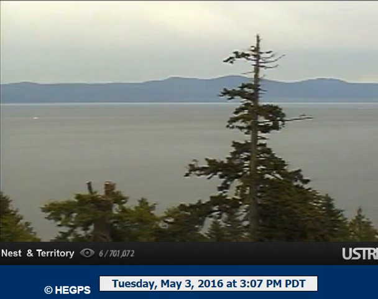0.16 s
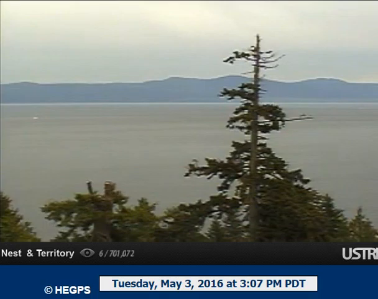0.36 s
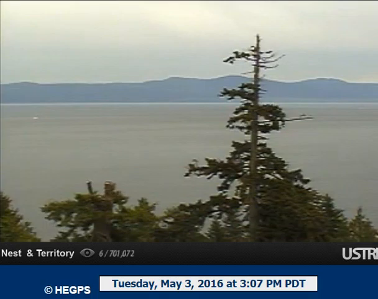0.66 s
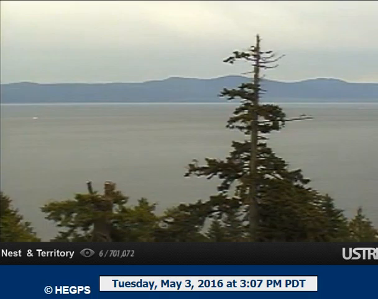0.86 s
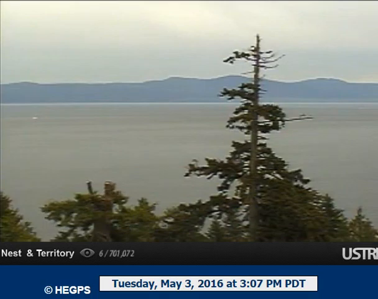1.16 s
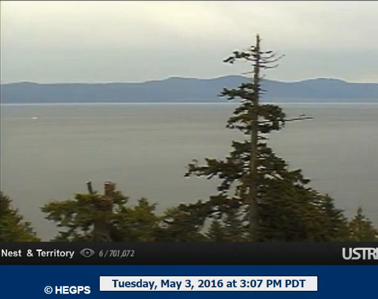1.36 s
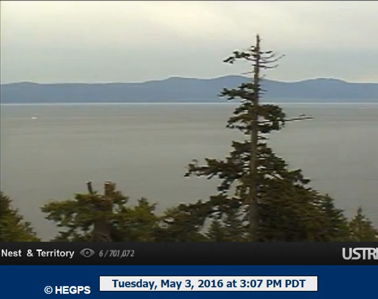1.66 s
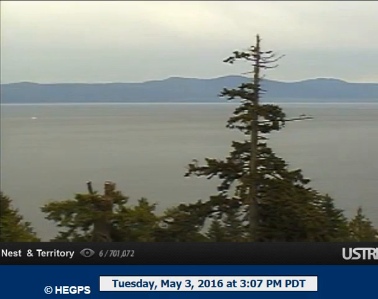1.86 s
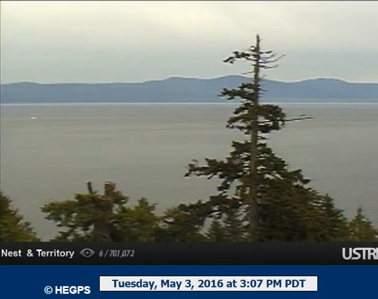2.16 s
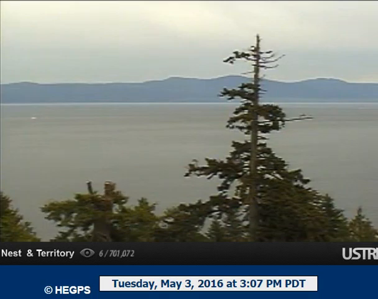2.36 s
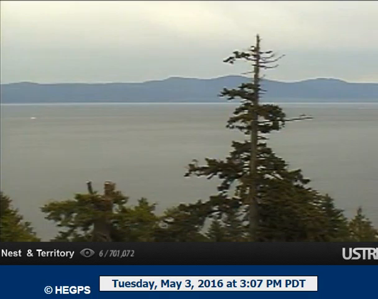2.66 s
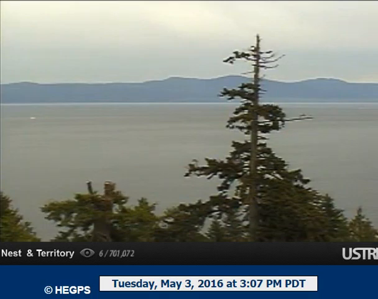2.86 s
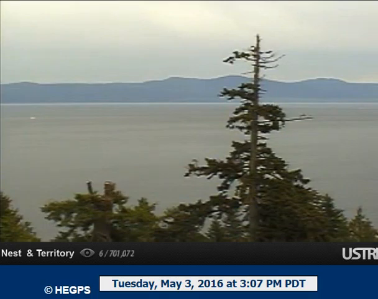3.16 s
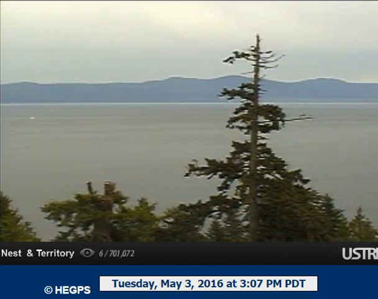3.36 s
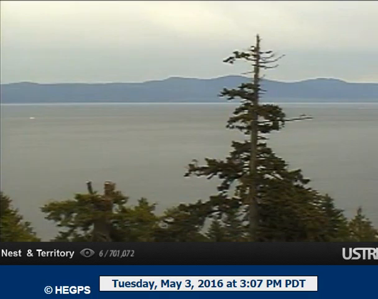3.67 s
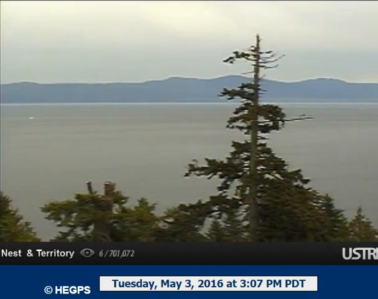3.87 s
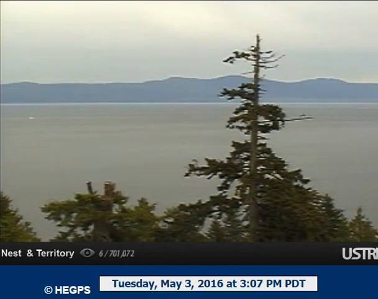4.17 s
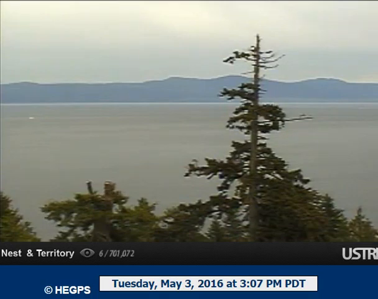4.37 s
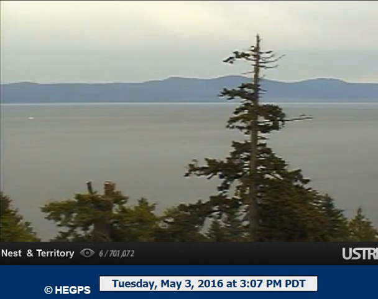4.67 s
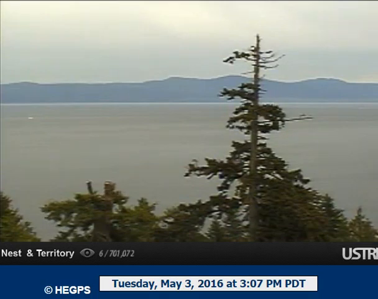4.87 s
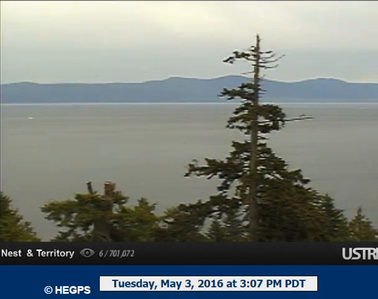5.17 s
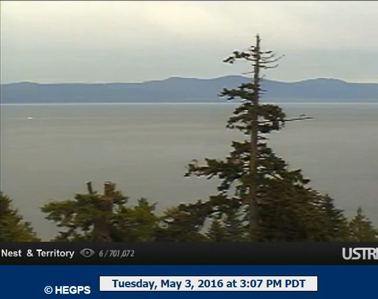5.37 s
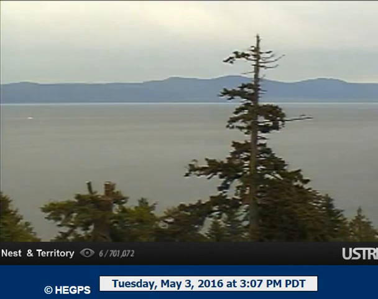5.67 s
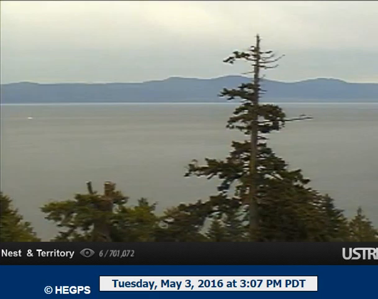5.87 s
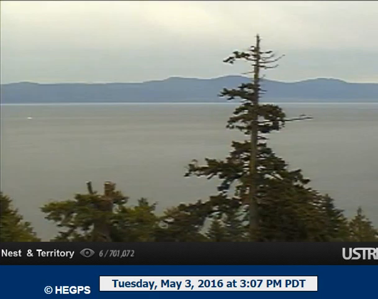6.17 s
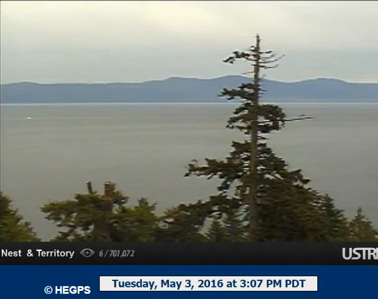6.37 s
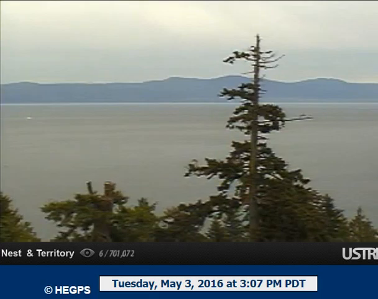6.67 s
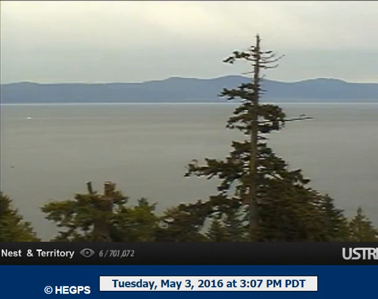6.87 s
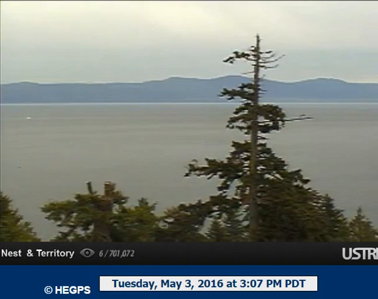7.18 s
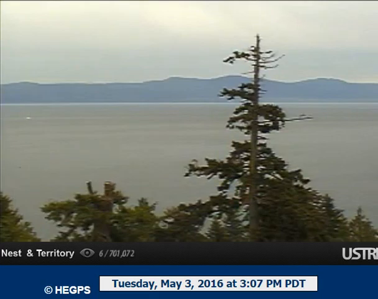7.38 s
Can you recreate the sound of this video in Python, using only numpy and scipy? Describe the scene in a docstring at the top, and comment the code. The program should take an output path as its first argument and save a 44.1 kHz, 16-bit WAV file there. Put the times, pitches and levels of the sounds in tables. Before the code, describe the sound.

Piping eagle calls, some leaping from a lower to a higher note, above a heavy low wind rumble that distorts in gusts on a narrow, gritty line.

```python
"""A treetop by the sea, heard from afar: two eagles trade thin whistled notes, each a gliding, wavering sine.
Short hoarse chirps, yelps and a diffuse twitter are the same kind of tone with a rougher voice.
Wind, as coloured noise, booms in the microphone housing over a distant wash and a mains buzz of summed harmonics.
The loudest gusts clip the narrow-band line, and a crude change of sample rate mirrors the notes into the treble."""
import sys
import numpy as np
from scipy import signal
from scipy.fft import rfft, irfft, next_fast_len
from scipy.io import wavfile
from scipy.ndimage import uniform_filter1d, map_coordinates

SR = 44100
rng = np.random.default_rng(int(sys.argv[2]) if len(sys.argv) > 2 else 0)


def persist_wave(psi):
    """Save psi, clipped to +-1, as 16-bit WAV."""
    counts = np.round(np.clip(psi, -1, 1) * 32767).astype(np.int16)
    wavfile.write(sys.argv[1], SR, np.atleast_2d(counts).T)


def volts(x):
    """Linear amplitude factor 10**(x/20) for a level x in dB, scalar or array-like."""
    e = np.asarray(x, float) / 20
    return 10 ** e


N = 332514  # samples

# Level of the housing boom, with some quick dips and swells. Each row: time in seconds, rms level in dB.
BOOM_LEVEL = [(0.0, -17), (0.4, -16), (0.84, -17), (0.86, -12), (0.94, -21), (1.01, -12.5), (1.05, -23),
              (1.17, -15), (1.76, -17), (2.35, -14.5), (3.0, -15), (3.04, -25), (3.09, -14), (4.96, -15.5),
              (5.67, -13), (5.92, -16), (7.43, -13.5), (7.54, -15.5)]
# Spectrum of the boom. Each row: frequency in Hz, relative density in dB per Hz.
BOOM_SPECTRUM = [(8.8, -45.5), (15, -20.5), (123, 3), (141, -1), (211, -20.5), (300, -32.5), (390, -66),
                 (660, -120)]
# Spectrum of the wash of leaves and water. Each row: frequency in Hz, relative density in dB per Hz.
WASH_SPECTRUM = [(200, -4.5), (270, -6.5), (340, 2), (420, -11), (500, -13.5), (600, -8.5), (720, -18.5),
                 (1000, -18), (1350, -22.5), (1700, -27), (2500, -28), (3300, -33.5), (4000, -38.5),
                 (4250, -59)]
# Mains harmonics, nearly all odd. Each row: approximate frequency in Hz, rms level in dB.
MAINS_HARMONICS = [(662.1, -61.5), (780.6, -60.5), (899.0, -64), (1017, -67), (1141, -65), (1260, -62.5),
                   (1378, -67), (1502, -75), (1620, -71.5), (1739, -67), (1857, -73), (1981, -91),
                   (2099, -70), (2218, -66.5), (2342, -70.5), (2579, -69.5), (2697, -71), (2821, -67),
                   (2939, -80.5), (3058, -70.5), (3182, -70), (3300, -67.5), (3418, -77), (3542, -69),
                   (3661, -74), (3779, -72.5), (3860, -86), (3898, -76.5), (4032, -83.5), (4221, -85)]
# Faint hoarse chirps further off. Each row: start in seconds, length in seconds, from Hz, to Hz, peak level in dB.
FAR_CHIRPS = [(.1, 0.035, 1327, 1252, -53.5), (.2, 0.042, 2075, 1750, -55.5), (.225, .03, 2220, 2170, -58),
              (1.75, 0.046, 2420, 2780, -57), (2.17, .04, 1870, 1985, -50.5),
              (2.843, .03, 2615, 2870, -45.5), (4.91, .05, 1817, 1863, -52), (4.93, .07, 2175, 1876, -55.5),
              (5.4, 0.064, 1747, 1733, -56.5), (5.41, 0.13, 2106, 1918, -54),
              (5.675, .025, 2633, 2430, -50.5), (6.02, 0.046, 3270, 3325, -55),
              (5.49, .04, 1633, 1620, -56), (6.3, 0.035, 1678, 2190, -51)]
# The first eagle's wavering calls, one list per call. Each row: time in seconds, pitch in Hz, level in dB.
FIRST_CALLS = [
    [(1.25, 2938, -63.5), (1.262, 2883, -49.5), (1.274, 2892, -39.5), (1.29, 3004, -52.5),
     (1.32, 3026, -47.5), (1.35, 2881, -59)],
    [(1.47, 2955, -68), (1.484, 2946, -51), (1.522, 2949, -52), (1.536, 3052, -48), (1.564, 3113, -55),
     (1.6, 3167, -62)],
    [(1.77, 2705, -73), (1.782, 2773, -54), (1.788, 2936, -51.5), (1.796, 2897, -46.5), (1.854, 2870, -44),
     (1.868, 3050, -42), (1.9, 2988, -57), (1.912, 2864, -57.5), (1.93, 2924, -64)],
    [(2.32, 2835, -57.5), (2.334, 2785, -45), (2.346, 2865, -37.5), (2.388, 2894, -43),
     (2.394, 2990, -37.5), (2.424, 3044, -42.5), (2.442, 3040, -53), (2.45, 2745, -56),
     (2.455, 2740, -50.5)],
    [(3.21, 2801, -63), (3.228, 2833, -41.5), (3.29, 2880, -51.5), (3.3, 2858, -35.5), (3.32, 2724, -35),
     (3.348, 2976, -58), (3.372, 2910, -41.5), (3.39, 2960, -40), (3.41, 3025, -70)],
    [(5.26, 2845, -68.5), (5.284, 2940, -43), (5.312, 2903, -42), (5.352, 2750, -59.5), (5.376, 2800, -40),
     (5.418, 3005, -43.5), (5.432, 3056, -62.5), (5.444, 2945, -45.5), (5.46, 2967, -70.5)],
    [(5.67, 2850, -67.5), (5.692, 2943, -45.5), (5.708, 2917, -52.5), (5.728, 2823, -44),
     (5.756, 2801, -45), (5.808, 2952, -39.5), (5.868, 3021, -42), (5.886, 2988, -45), (5.92, 2882, -70.5)],
    [(6.12, 2901, -61.5), (6.128, 2940, -51.5), (6.16, 2973, -57.5), (6.174, 2980, -40.5),
     (6.19, 2841, -53.5), (6.248, 2910, -35), (6.258, 2974, -52), (6.282, 3003, -37.5), (6.32, 2930, -50.5)],
    [(6.63, 2847, -75), (6.646, 2741, -43.5), (6.682, 3024, -35), (6.71, 2843, -33.5), (6.728, 2846, -62),
     (6.776, 2896, -35), (6.832, 2988, -50), (6.878, 2892, -45.5), (6.89, 2779, -69)],
    [(7.04, 2811, -63.5), (7.052, 2804, -51.5), (7.074, 2956, -39.5), (7.092, 2955, -43),
     (7.124, 2917, -38), (7.254, 2988, -41), (7.264, 2980, -36), (7.276, 2940, -45.5), (7.3, 2936, -65)],
    [(7.46, 2745, -69), (7.47, 2732, -51.5), (7.48, 2877, -45.5), (7.508, 2918, -55), (7.528, 2860, -39.5),
     (7.54, 2839, -41)],
    [(3.79, 2696, -59), (3.81, 2770, -40), (3.845, 2950, -39), (3.872, 3030, -38), (3.9, 3000, -51)],
]
# Low husky yelps. Each row: start in seconds, length in seconds, from Hz, to Hz, peak level in dB.
HUSKY_YELPS = [(1.565, 0.065, 1183, 1226, -47), (1.605, .055, 1427, 1540, -47),
               (1.635, 0.06, 1368, 1324, -50), (1.762, .035, 1262, 1447, -41),
               (3.3, 0.037, 1352, 1463, -40.5)]
# The second eagle's opening climbs in the lower register, one list per call.
# Each row: time in seconds, pitch in Hz, level in dB.
LOWER_REGISTER = [
    [(1.86, 2630, -53), (1.872, 2430, -44.5), (1.904, 2498, -36.5), (2.044, 2567, -36.5),
     (2.056, 2670, -37), (2.062, 2583, -42)],
    [(2.31, 2667, -62), (2.324, 2353, -39.5), (2.356, 2515, -38), (2.466, 2405, -30.5), (2.524, 2627, -33),
     (2.53, 2613, -48.5)],
    [(2.855, 2586, -56.5), (2.861, 2365, -49), (2.871, 2360, -36), (2.935, 2476, -33.5), (2.949, 2536, -34),
     (2.968, 2497, -51.5)],
    [(3.34, 2360, -57), (3.354, 2324, -41.5), (3.36, 2500, -58.5), (3.372, 2425, -42), (3.416, 2510, -39.5),
     (3.43, 2595, -47)],
    [(3.73, 2253, -69.5), (3.746, 2331, -44), (3.812, 2442, -47.5), (3.818, 2670, -59), (3.832, 2520, -43),
     (3.86, 2550, -54.5)],
    [(4.17, 2246, -60.5), (4.184, 2273, -44), (4.24, 2544, -37.5), (4.248, 2555, -43.5), (4.292, 2567, -41),
     (4.31, 2654, -62.5)],
]
# Its calls after the voice breaks into the upper register, one list per call.
# Each row: time in seconds, pitch in Hz, level in dB.
UPPER_REGISTER = [
    [(2.05, 2694, -58), (2.058, 2730, -31.5), (2.066, 2884, -39), (2.084, 3063, -35.5), (2.11, 2980, -43.5),
     (2.118, 3160, -42.5), (2.14, 3020, -60.5)],
    [(2.52, 2710, -42), (2.53, 2793, -29.5), (2.552, 2882, -34.5), (2.652, 2948, -37.5), (2.664, 3080, -45),
     (2.684, 3030, -34.5), (2.71, 3290, -65.5)],
    [(2.95, 2726, -66), (2.952, 2737, -42), (2.96, 2955, -33.5), (2.98, 2965, -33.5), (3.04, 2790, -29.5),
     (3.09, 2903, -33), (3.12, 2900, -48.5)],
    [(3.42, 2660, -55), (3.43, 2900, -41), (3.488, 2920, -36), (3.506, 2853, -41), (3.546, 2913, -39),
     (3.558, 3080, -43.5), (3.58, 2910, -72)],
    [(4.28, 2585, -54), (4.298, 2836, -40), (4.31, 2863, -53), (4.322, 2846, -38.5), (4.368, 2910, -48.5),
     (4.38, 2985, -39), (4.4, 2870, -64.5)],
    [(3.835, 2803, -52), (3.86, 2855, -42), (3.9, 2890, -41), (3.95, 2900, -45), (3.98, 2810, -57.5)],
]
# Short falling notes that close those calls.
# Each row: start in seconds, length in seconds, from Hz, to Hz, peak level in dB.
CLOSING_DROPS = [(2.622, .025, 2384, 2280, -37), (3.103, .03, 2350, 2127, -37),
                 (3.55, 0.03, 2280, 2130, -52), (3.965, .04, 2335, 2222, -45),
                 (4.37, .04, 2350, 2274, -44.5)]
# Throaty catches before a note. Each row: start in seconds, length in seconds, third harmonic from Hz,
# third harmonic to Hz, peak level of that harmonic in dB.
THROATY_CATCHES = [(2.3, 0.049, 1338, 1423, -44.5), (2.84, 0.069, 1343, 1436, -45.5),
                   (3.72, 0.045, 1284, 1390, -49)]
# Diffuse twitter of far birds. Each row: start in seconds, length in seconds, from Hz, to Hz,
# peak level of four voices together in dB.
FAR_TWITTER = [(3.95, .25, 3086, 3010, -57.5), (4.0, .2, 2660, 2590, -57), (6.0, .2, 3250, 3240, -56.5),
               (6.2, .32, 3234, 3160, -52.5)]
# The hardest buffets on the housing. Each row: time in seconds, peak level in dB, pitch in Hz.
HARD_BUFFETS = [(6.521, -4.0, 115), (6.819, -4.2, 115), (6.974, -4.3, 118), (7.1, -4.4, 125),
                (7.207, -5.6, 120), (7.355, -4.8, 120)]

PEAK_AT, CHIRP_FROM_DB, CHIRP_TO_DB = .35, -5, -8  # short notes: share of length before the peak, ends re peak
GUSTS_DB, WASH_DB, WASH_SWAY_DB = .5, -40.5, .27  # random swing of the boom; level of the wash and its swing
HASH_DB = -26.5  # gain of the whistle-driven hiss before its band filter
RATE_IN, RATE_OUT = 147, 160  # ratio of the two sample rates


def unit(x):
    """Normalisation to an rms of 1."""
    return x / np.sqrt(np.mean(x ** 2) + 1e-20)


def along(points, hz):
    """Spectral gain interpolated in dB over log frequency, practically silent outside the points."""
    f, db = np.transpose(points)
    return volts(np.interp(np.log(hz + 1), np.log(f + 1), db, -120, -120))


def wobble(rate, count=N):
    """Band-limited random motion: a spline through random knots, rate of them a second."""
    knots = rng.standard_normal(int(count * rate / SR) + 4)
    return map_coordinates(knots, [np.arange(count) * rate / SR])


def filtered(x, response):
    """Linear filtering as a product of the spectrum and a response of frequency."""
    size = next_fast_len(N + 8192)
    return irfft(rfft(x, size) * response(np.fft.rfftfreq(size, 1 / SR)), size)[..., :N]


def rush(spectrum, patchy_db):
    """Turbulence as coloured noise of rms 1, with random gain over patches of time and frequency."""
    grains = signal.stft(rng.standard_normal(N), nperseg=512)[2]
    field = uniform_filter1d(rng.standard_normal(grains.shape), 6, 0)
    field = uniform_filter1d(field, 10, 1)
    noise = signal.istft(grains * volts(patchy_db * unit(field)), nperseg=512)[1][:N]
    return unit(filtered(noise, lambda hz: along(spectrum, hz)))


def wind_boom():
    """Resonance of the housing under wind: low coloured noise whose damping grows with its swing."""
    s, boom_db = np.transpose(BOOM_LEVEL)
    t = np.arange(N) / SR
    boom = rush(BOOM_SPECTRUM, patchy_db=0.0)
    swing = np.abs(signal.hilbert(boom, next_fast_len(N))[:N])
    boom = unit(boom / (1 + (swing / 1.75) ** 4) ** 0.19)  # the largest swells level off
    return boom * volts(np.interp(t, s, boom_db) + GUSTS_DB * wobble(7))


def wash():
    """Many small incoherent sources, leaves and water, add up to a gently swaying coloured noise."""
    return volts(WASH_DB + WASH_SWAY_DB * wobble(2.6)) * rush(WASH_SPECTRUM, patchy_db=1.0)


def mains_buzz():
    """Mains pick-up: harmonics in step make a spike each half cycle, smeared by the line's dispersive delay."""
    t = np.arange(N) / SR
    mains_hz = 59.99
    buzz = np.zeros(N)
    for hz, db in MAINS_HARMONICS:
        cycles = np.round(hz / 60) * mains_hz * t
        lag = 0.95 * (hz / 4000) ** 2  # cycles
        buzz += np.sqrt(2) * volts(db) * np.cos(2 * np.pi * (cycles + lag))
    return buzz


def whistles(notes, partials, hoarse, waver_hz, edge):
    """Frequency modulation makes a tone glide and waver; a hoarse share of random amplitude spreads its line.

    partials: (frequency ratio, dB); hoarse: share of power; edge: fade in seconds."""
    out = np.zeros(N)
    for note in notes:
        s, hz, db = np.transpose(note)
        n = np.arange(round(s[0] * SR), min(N, round(s[-1] * SR)))
        t = n / SR
        glide = uniform_filter1d(np.interp(t, s, hz), size=SR // 100)
        phase = 2 * np.pi * np.cumsum(glide + waver_hz * wobble(90, count=len(n))) / SR
        fade = np.clip(np.minimum(t - s[0], s[-1] - t) / edge, 0, 1)
        voice = np.sqrt(1 - hoarse) + np.sqrt(hoarse) * wobble(220, count=len(n))
        level = np.sqrt(2) * fade * voice * volts(np.interp(t, s, db))
        out[n] += level * sum(volts(rel_db) * np.sin(ratio * phase) for ratio, rel_db in partials)
    return out


def chirps(rows):
    """A short note as one swell and fade over a straight glide in frequency."""
    notes = []
    for s, span, hz0, hz1, db in rows:
        start = (s, hz0, db + CHIRP_FROM_DB)
        peak = (s + PEAK_AT * span, hz0 + PEAK_AT * (hz1 - hz0), db)
        end = (s + span, hz1, db + CHIRP_TO_DB)
        notes.append([start, peak, end])
    return notes


def far_chirps():
    """Hoarse tones: random amplitude modulation widens each gliding line into a narrow band."""
    return whistles(chirps(FAR_CHIRPS), [(1, 0)], hoarse=.3, waver_hz=20, edge=.006)


def with_trees(birds):
    """Diffuse scattering among trees: convolution with noise that decays exponentially."""
    t = np.arange(SR // 2) / SR
    trees = rng.standard_normal(len(t)) * volts(-60 * t)  # falls 60 dB a second
    trees = trees / np.linalg.norm(trees)
    return birds + volts(-19) * signal.fftconvolve(birds, trees)[:N]


def first_eagle():
    """A nearly pure whistle: a single partial follows the wavering pitch curve of each call."""
    return whistles(FIRST_CALLS, [(1, 0)], hoarse=.09, waver_hz=10, edge=.003)


def husky_yelps():
    """Low gliding tones roughened by random modulation of both amplitude and frequency."""
    return whistles(chirps(HUSKY_YELPS), [(1, 0)], hoarse=.25, waver_hz=25, edge=.006)


def second_eagle():
    """Register break of a whistled voice: a low climb, a leap to the upper register, a falling close."""
    low = whistles(LOWER_REGISTER + chirps(CLOSING_DROPS), [(1, 0)], hoarse=.06, waver_hz=10, edge=.003)
    high = whistles(UPPER_REGISTER, [(1, 0)], hoarse=.09, waver_hz=10, edge=.003)
    return low + high


def throaty_catches():
    """Two neighbouring harmonics, the third and fourth, imply a low pitch that is itself absent."""
    return whistles(chirps(THROATY_CATCHES), [(1, 0), (4 / 3, -6)], hoarse=.25, waver_hz=25, edge=.006)


def far_twitter():
    """Incoherent addition: four independent, very hoarse voices blur each note into a band of noise."""
    return whistles(chirps(FAR_TWITTER) * 4, [(1, -6)], hoarse=.9, waver_hz=130, edge=.02)


def buffeted(boom):
    """Transient excitation: a buffet takes over the swing for a few cycles, pulling hard to one side."""
    t = np.arange(N) / SR
    for at, peak_db, hz in HARD_BUFFETS:
        hold = np.exp(-((t - at) / 0.0084) ** 2)
        boom = boom * (1 - hold) - hold * volts(peak_db) * np.cos(2 * np.pi * hz * (t - at))
    return boom


def scene():
    """Superposition of birds, wind and buzz."""
    air = buffeted(wind_boom()) + wash() + mains_buzz()
    birds = far_chirps() + first_eagle() + husky_yelps() + second_eagle() + throaty_catches() + far_twitter()
    return (air + with_trees(birds))[None]


def lopsided_clip(x):
    """Asymmetric saturation: the amplifier runs out of room sooner on one side.

    Each flat top blanks the whistle for a millisecond or two."""
    top = np.where(x > 0, .345, .75)
    return x / (1 + np.abs(x / top) ** 16) ** (1 / 16)


def narrow_line(x):
    """Band limiting: a series capacitor tilts the flat tops, a steep low-pass ends the band, and hiss is added."""
    def response(hz):
        coupling = 1j * hz / (25 + 1j * hz)
        return coupling / np.sqrt(1 + (hz / 4150) ** 40)
    return filtered(x, response) + volts(-72.0) * rng.standard_normal(N)  # hiss of the receiving end


def whistle_hash(line):
    """Multiplicative noise: hiss that rides on whatever lies above about 2 kHz, heard over the band edge."""
    whistle = filtered(line, lambda hz: 1 / np.sqrt(1 + (2000 / (hz + 1)) ** 12))
    noise = whistle * rng.standard_normal(N)
    return volts(HASH_DB) * filtered(noise, lambda hz: (hz > 4300) & (hz < 6500))


def crude_rate_change(line):
    """Periodic timing error: repeating samples instead of interpolating creates sidebands."""
    # a repeat every eleventh sample or so is a sawtooth in time: sidebands at multiples of 3900 Hz
    repeated = line[:, np.arange(N * RATE_OUT // RATE_IN) * RATE_IN // RATE_OUT]
    back = signal.resample_poly(repeated, RATE_IN, RATE_OUT, axis=1)
    back = np.pad(back, ((0, 0), (0, 2)))[:, :N]
    return filtered(back, lambda hz: 1 / np.sqrt(1 + (hz / 9150) ** 60))


def band_limit(x):
    """A steep low-pass at the top of the band."""
    return signal.sosfilt(signal.butter(12, 15480, fs=SR, output="sos"), x)


def record(dry):
    """Distortion in series: lopsided clipping, a narrow line, a crude rate change and a last hard rail."""
    line = narrow_line(lopsided_clip(dry))
    line = line + whistle_hash(line)
    back = crude_rate_change(line)
    finished = np.maximum(back, -.545)  # the deepest swings hit the other rail and tick
    return band_limit(finished)


dry = scene()
out = record(dry)
persist_wave(out)
```